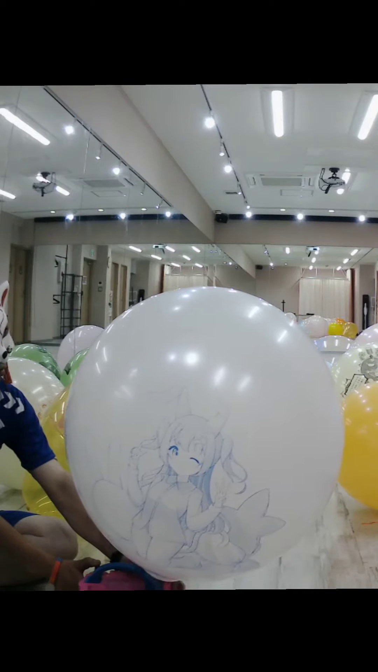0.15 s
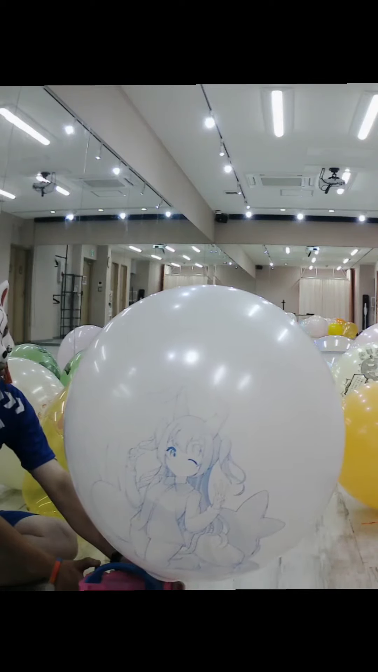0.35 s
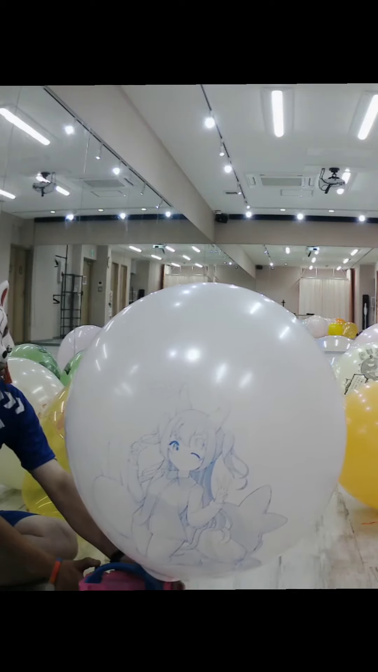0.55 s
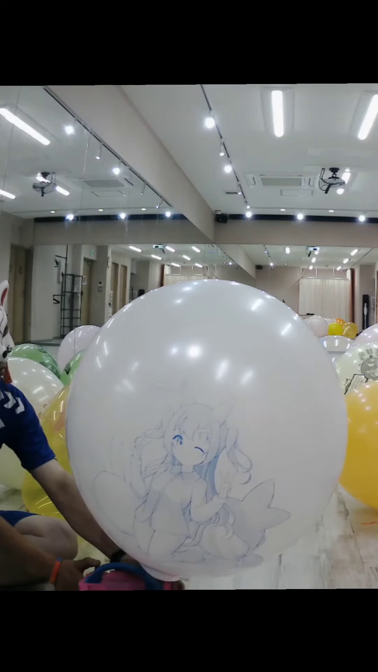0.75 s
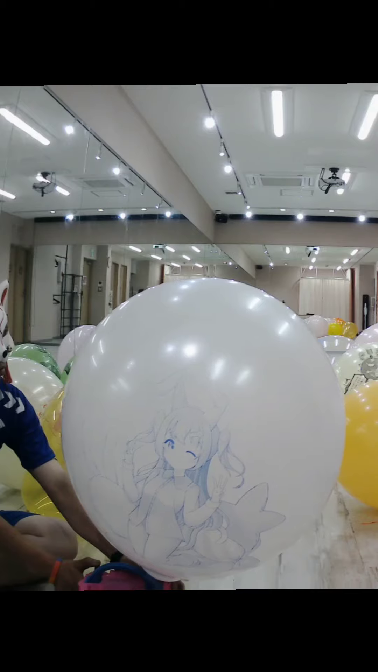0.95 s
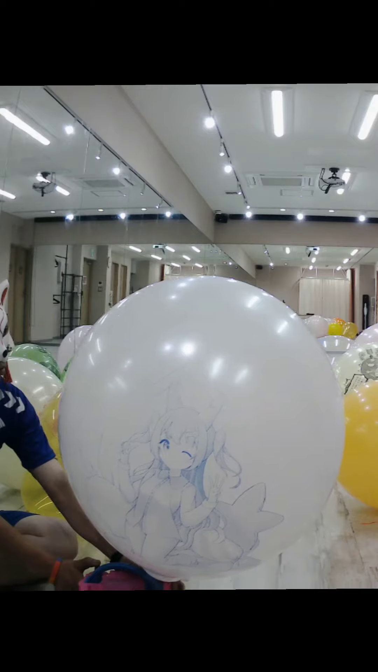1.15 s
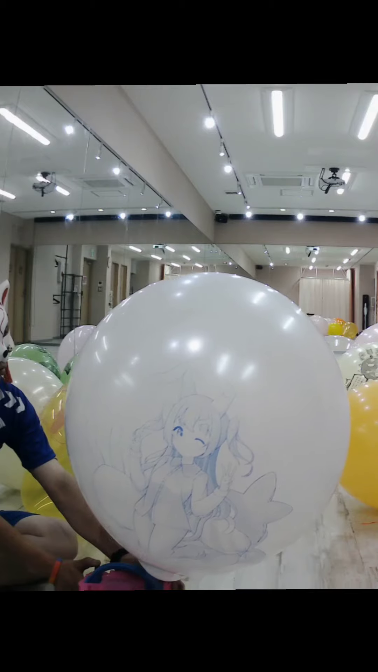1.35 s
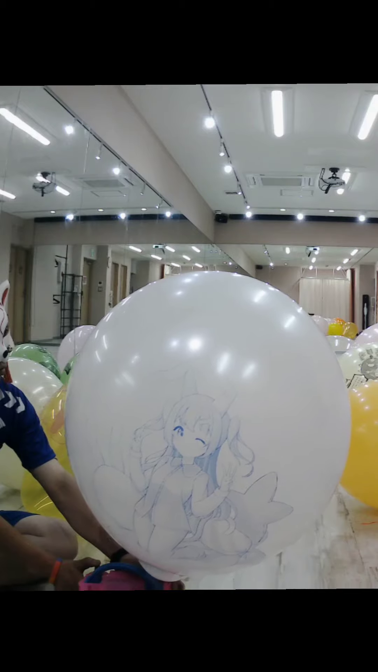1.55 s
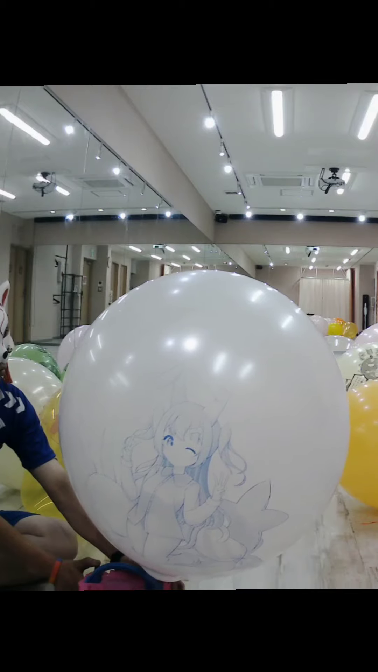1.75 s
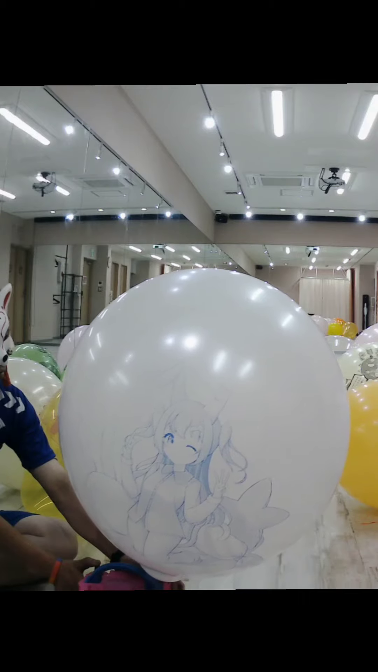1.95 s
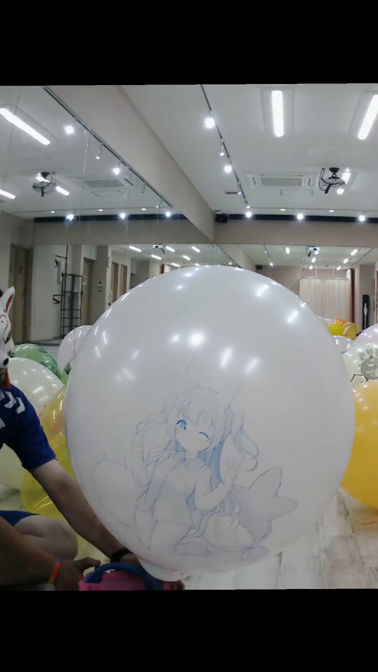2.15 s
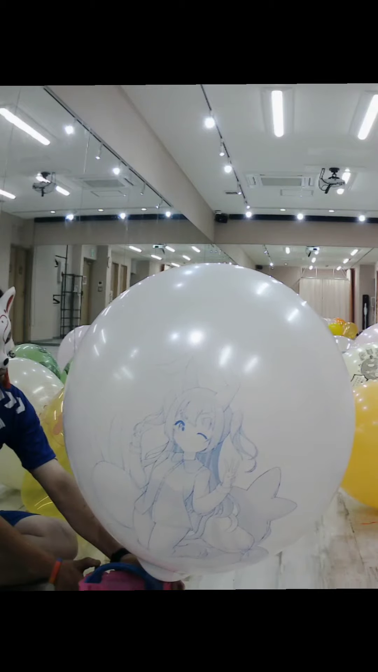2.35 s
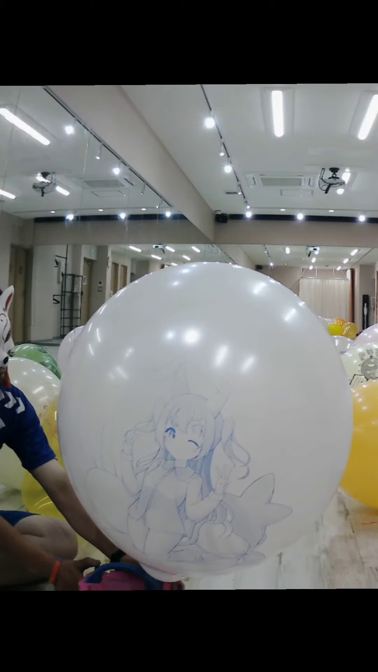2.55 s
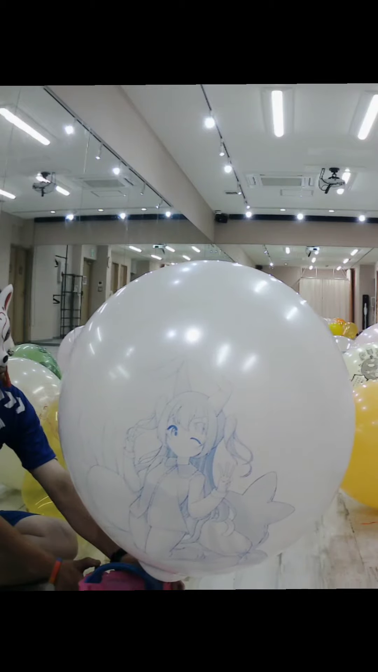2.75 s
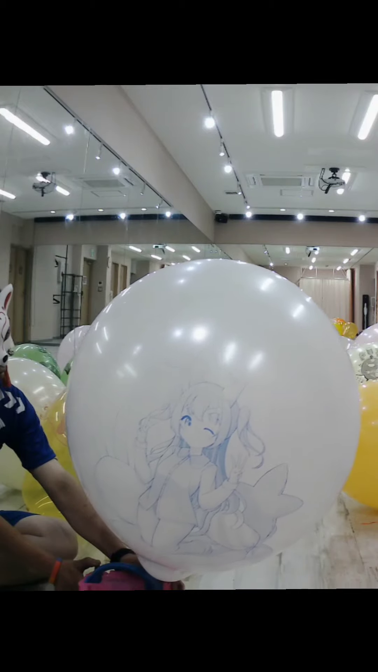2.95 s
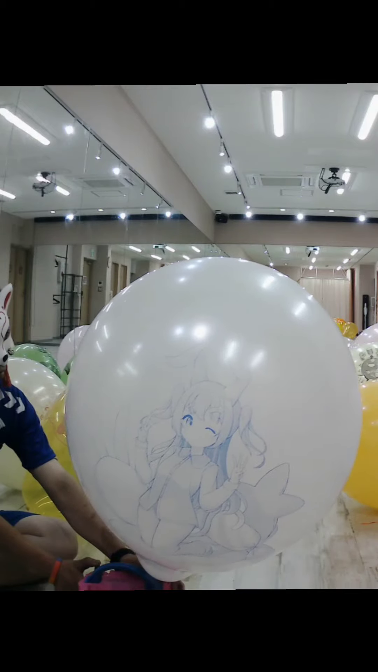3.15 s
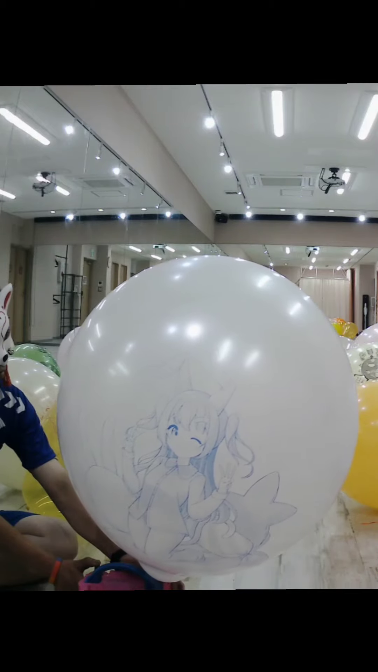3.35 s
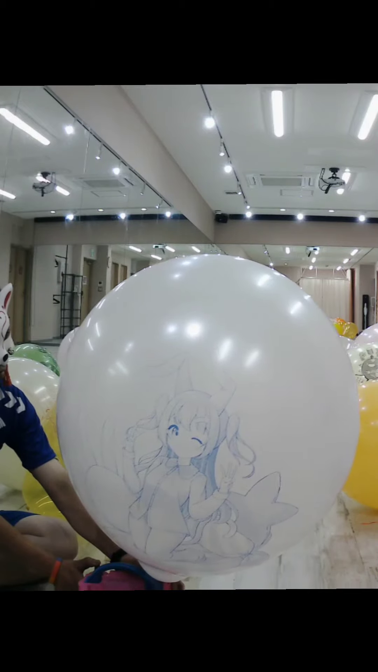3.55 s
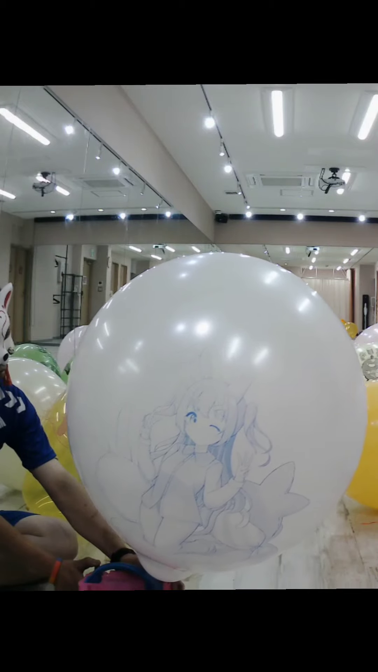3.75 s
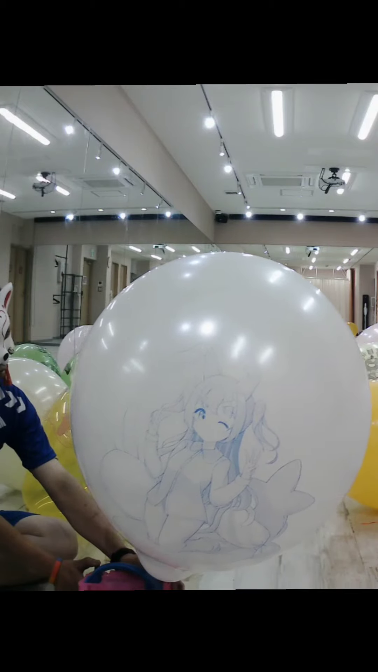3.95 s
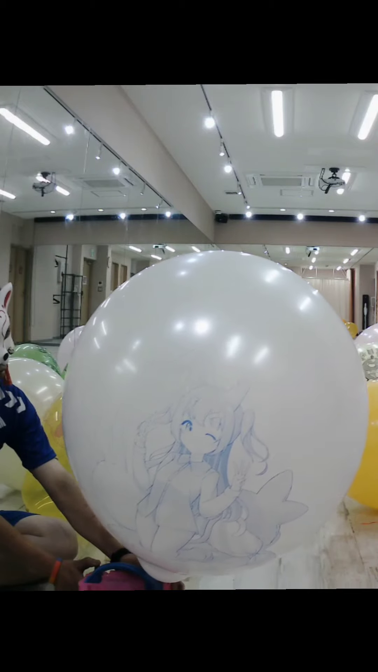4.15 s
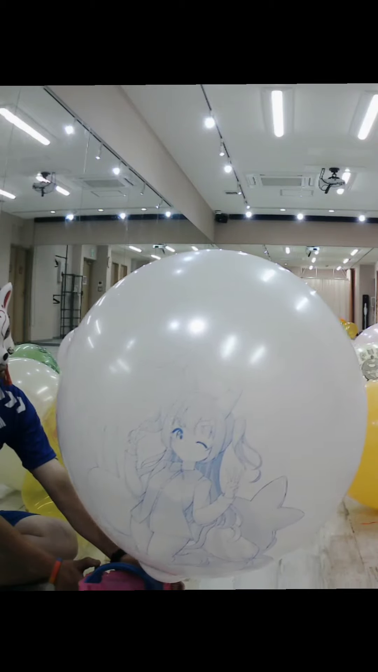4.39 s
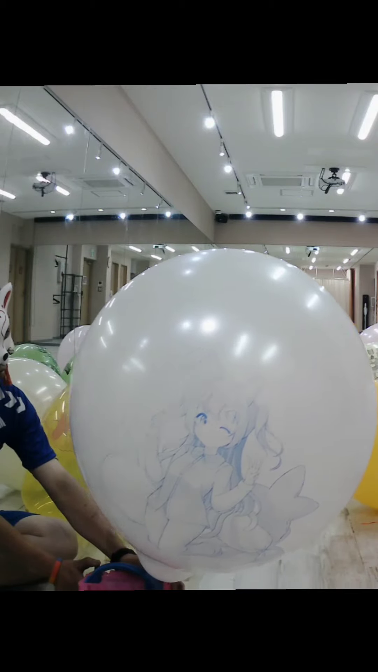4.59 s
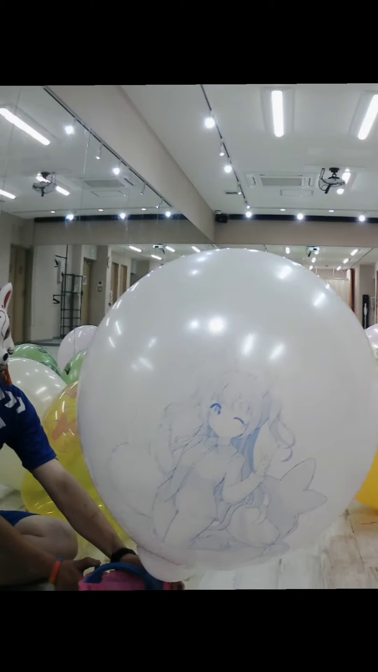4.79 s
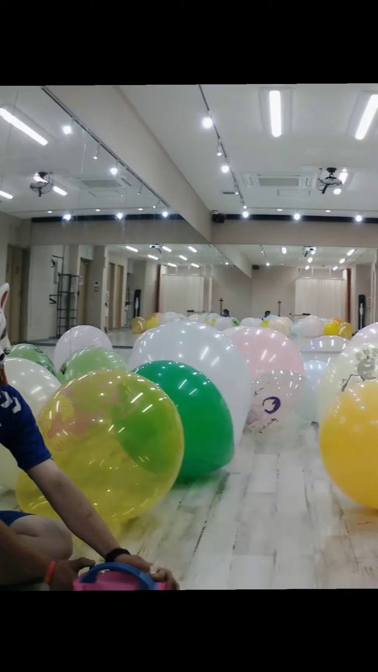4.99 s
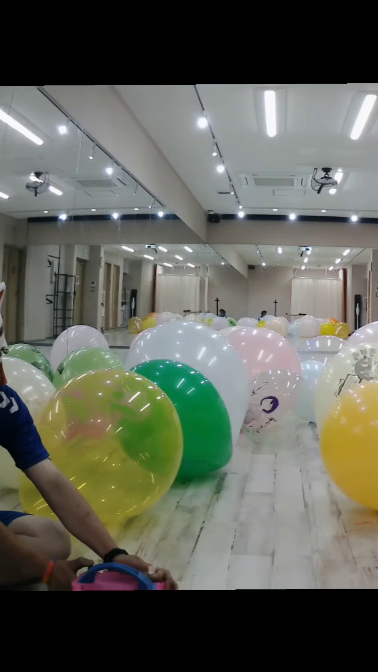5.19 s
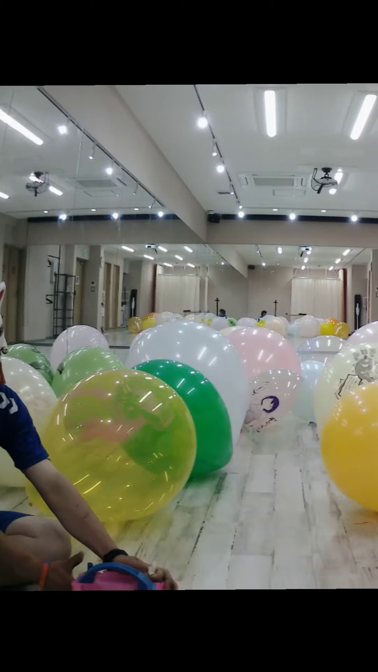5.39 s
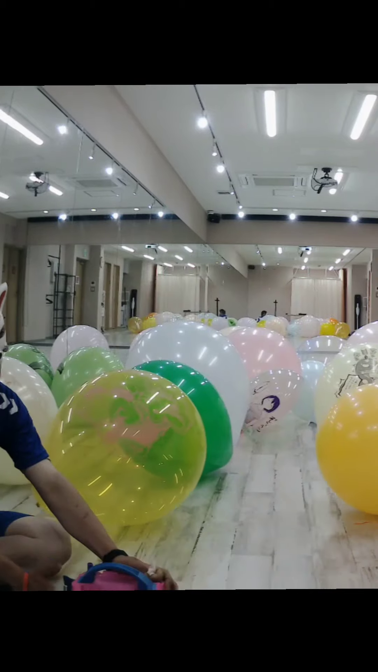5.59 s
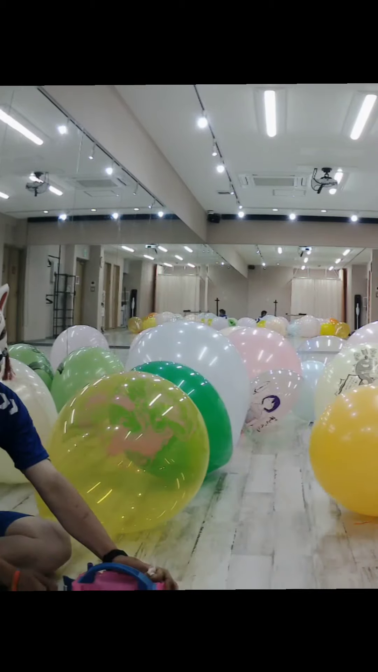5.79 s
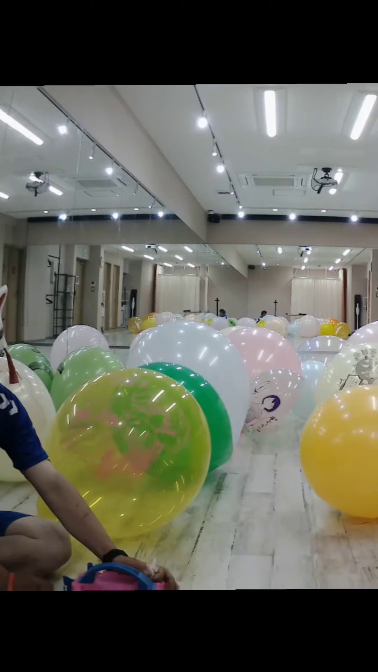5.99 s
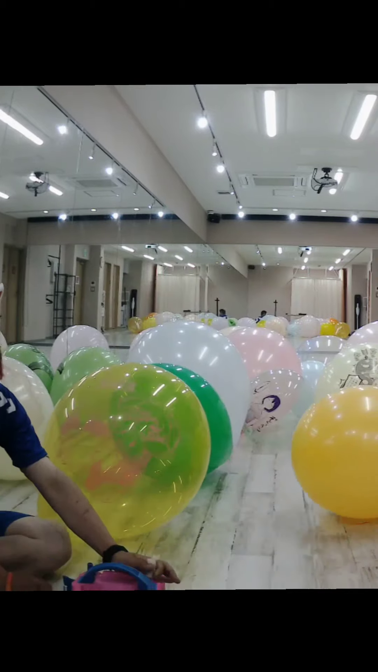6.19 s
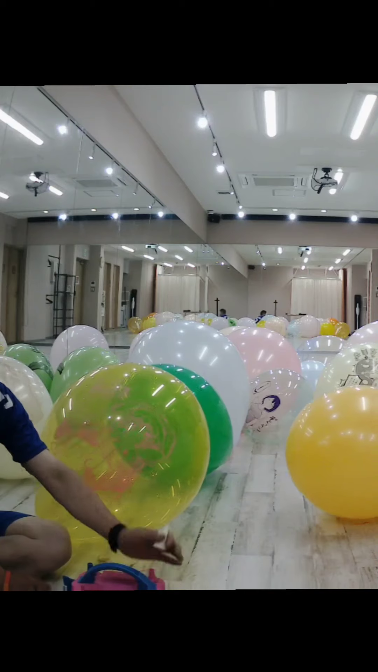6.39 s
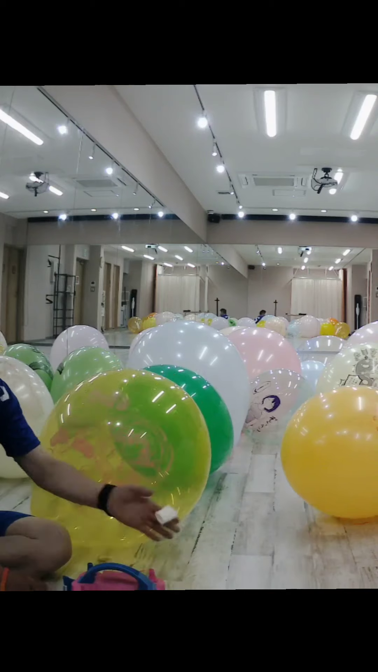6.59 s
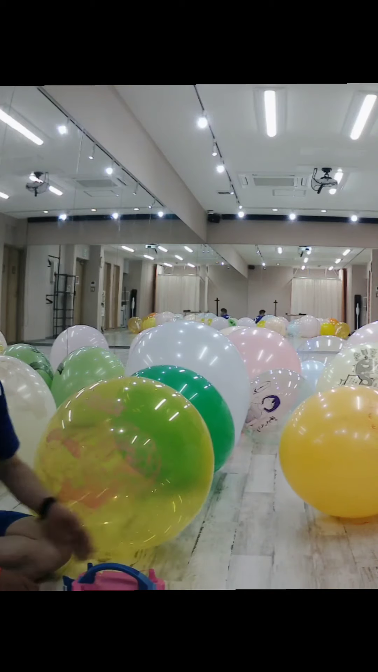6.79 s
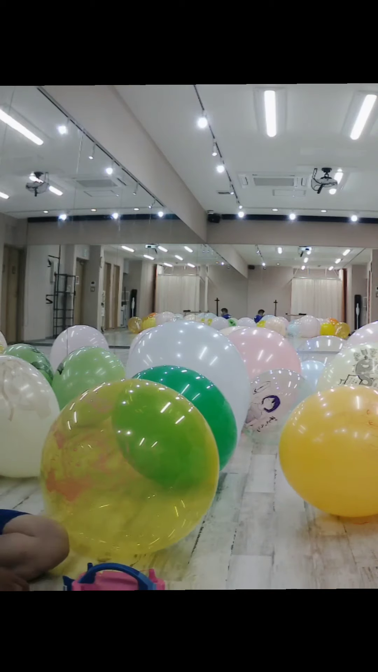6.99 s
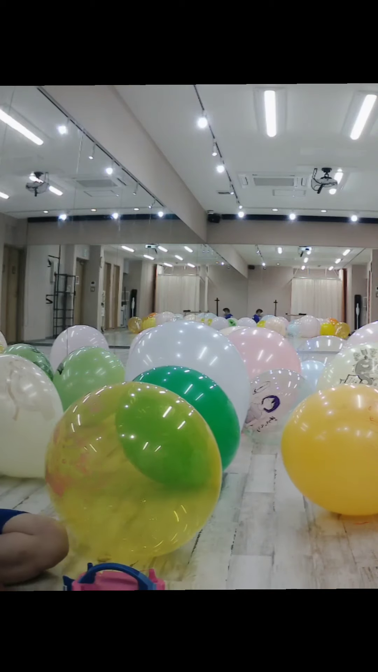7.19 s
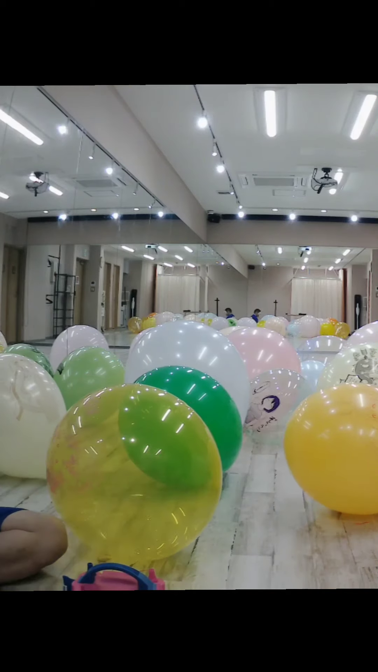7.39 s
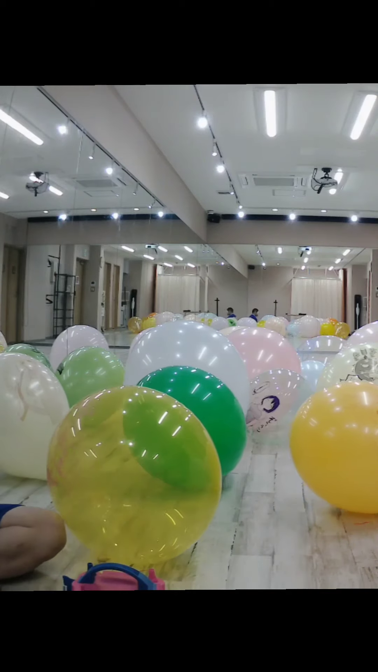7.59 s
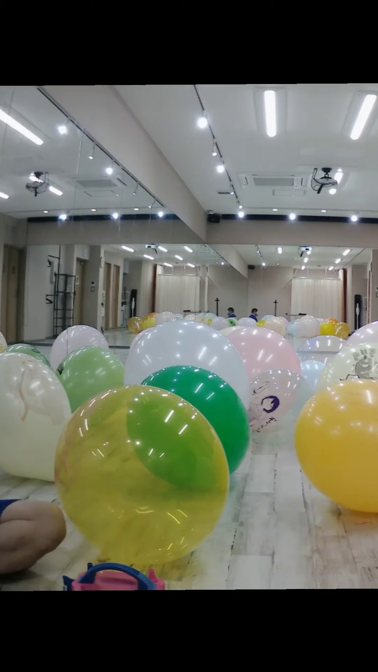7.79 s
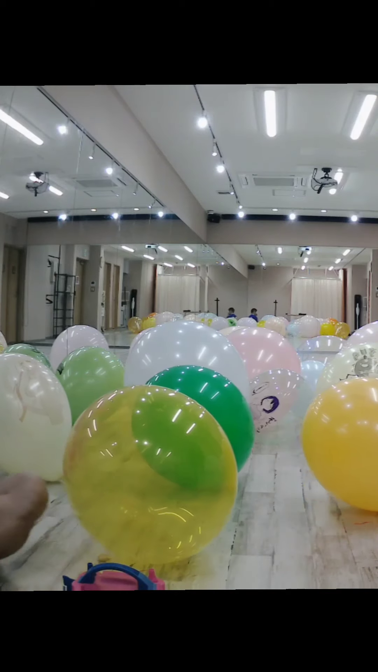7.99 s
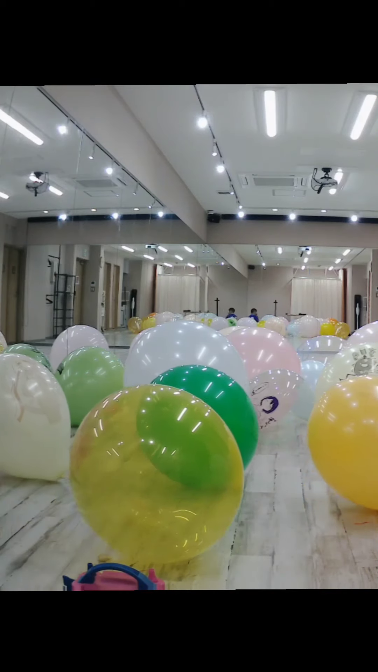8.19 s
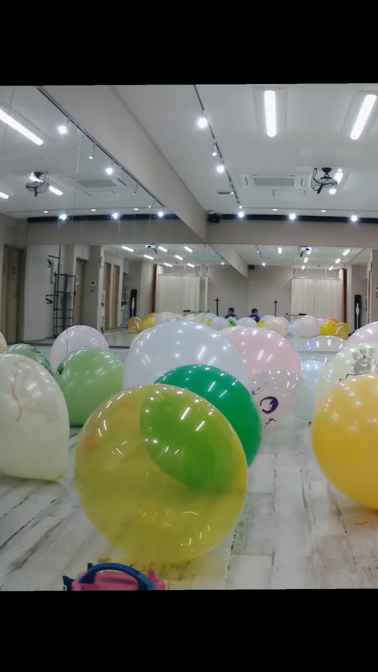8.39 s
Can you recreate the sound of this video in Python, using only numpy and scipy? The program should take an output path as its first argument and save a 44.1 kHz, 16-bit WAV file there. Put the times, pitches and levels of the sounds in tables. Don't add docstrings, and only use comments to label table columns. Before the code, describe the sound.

From 0 to 5 seconds a small electric pump runs close to the microphone in a big, hard-walled hall: a steady tonal whine around a midrange pitch, faint higher whistles and a thick roar of turbulent air, coloured by the growing balloon. The whine sinks into the roar around 2 to 4 seconds, then comes forward again. At about 5.1 the balloon bursts with a sharp shock and low boom, so loud that the input clips flat and distorts; a dense reverberation fades over roughly a second. From about 5.7 the switched-off motor emerges, its whine sliding steadily downward as its air noise thins. Around 6.3 to 6.7 there is a soft hand bump, rubber rustling and a brief panel buzz. Small snaps follow between 6.8 and 8, then a faint low foot bump near 8.2, over quiet ventilation hum.

```python
import sys
import numpy as np
from scipy import signal
from scipy.fft import rfft, irfft
from scipy.io import wavfile
from scipy.ndimage import uniform_filter1d

SR = 44100
rng = np.random.default_rng(int(sys.argv[2]) if len(sys.argv) > 2 else 0)


def rack_gain(trim_db):
    fader = np.asarray(trim_db, float)
    return 10 ** (fader / 20)


def put_to_file(sound):
    columns = np.atleast_2d(sound).T
    safe = np.clip(columns, -1, 1)
    whole_steps = np.round(safe * 32767)
    wavfile.write(sys.argv[1], SR, whole_steps.astype(np.int16))


N = 372204

BURST_S = 5.0708
REVERB_S = 5.792


def rms_one(x):
    return x / np.sqrt(np.mean(x ** 2) + 1e-20)


def in_time(rows):
    s, values = np.transpose(rows)
    return np.interp(np.arange(N) / SR, s, values)


def at_hz(points, hz):
    point_hz, values = np.transpose(points)
    return np.interp(np.log(hz), np.log(point_hz), values)


def drift(rate_hz):
    count = int(N / SR * 2 * rate_hz) + 2
    return np.interp(np.linspace(0, count - 1, N), np.arange(count), rng.standard_normal(count))


def envelope(start_s, rise_s, hold_s, fall_s):
    t = np.arange(N) / SR - start_s
    return np.clip(np.minimum(t / rise_s, (rise_s + hold_s + fall_s - t) / fall_s), 0, 1) ** 2


def resonance_db(hz, peaks):
    return sum(db / (1 + (2 * (hz - f) / width) ** 2) for f, width, db in peaks)


def coloured(spectrum, peaks=(), ripple_db=0):
    hz = np.maximum(np.fft.rfftfreq(N, 1 / SR), 1)
    ripple = np.interp(hz / 22, np.arange(1100), rng.standard_normal(1100))
    shape_db = at_hz(spectrum, hz) + resonance_db(hz, peaks) + ripple_db * (hz > 1400) * ripple
    return rms_one(irfft(rfft(rng.standard_normal(N)) * rack_gain(shape_db), N))


def tone(turns, multiple, db):
    return np.sqrt(2) * rack_gain(db) * np.sin(2 * np.pi * multiple * turns)


# (time [s], rate [turns/s])
SHAFT_RATE = [
    (0.0, 586.9),
    (1.42, 587.0),
    (5.06, 589.1),
]
# (time [s], level [dB])
SHAFT_TONE = [
    (0.0, -20.5),
    (1.0, -23),
    (1.7, -25.5),
    (2.2, -31.5),
    (3.25, -36),
    (4.2, -29.5),
    (4.7, -22.5),
    (5.05, -21.5),
]
# (multiple of shaft rate, level [dB])
WHISTLES = [(2, -44), (12, -66), (14, -87)]
# (frequency [Hz], density [dB/Hz])
ROAR = [(18, -76.5), (30, -39.5), (134, -29.5), (234, -19.5), (488, -13.5), (582, -7), (628, -6),
        (1180, -9), (1560, -20), (1820, -16), (3020, -24), (4210, -24.5), (4650, -28.5), (6310, -27.5),
        (12800, -41.5), (16700, -71), (22000, -120)]
# (frequency [Hz], width [Hz], lift [dB])
RESONANCES = [(175.2, 15, 4.5), (225, 20, 6), (251, 14, 2.9), (306, 8.3, 2.8), (357, 18, 4.5), (430, 15, 2.6),
              (464.5, 20, 4), (611, 16, 1.2), (707, 18, 9.4), (732, 20, 4), (838, 25, 5.8), (863.5, 22, 6.2),
              (910, 15, 4.4), (975, 12, 2.8), (1061, 34, 5.7), (1110, 25, 2.6), (1387, 25, 3.6),
              (1796, 59, 5), (2440, 220, 3), (3593, 220, 6), (3630, 55, 5.5), (4400, 210, 3), (5240, 210, 4.5),
           (6180, 70, 5), (8460, 400, -5), (9040, 290, 2), (9860, 110, -1)]


def pump():
    t = np.arange(N) / SR
    switch_off_s, fade_s = 5.35, 0.1
    turns = np.cumsum(in_time(SHAFT_RATE) + 0.3 * drift(8)) / SR
    shaft = tone(turns, 1, in_time(SHAFT_TONE) + 0.74 * drift(12))
    swell_peak_s, swell_period_s, swell_db = 1.1, 2.6, 4.5
    impeller_db = -48.5 + swell_db * np.cos(2 * np.pi * (t - swell_peak_s) / swell_period_s)
    impeller = tone(turns, 7, impeller_db + 1.5 * drift(3.0))
    whistles = sum(tone(turns, k, db + 3 * drift(5)) for k, db in WHISTLES)
    roar = rack_gain(-27.3 + 0.5 * drift(9)) * coloured(ROAR, RESONANCES, 1.7)
    return (shaft + impeller + whistles + roar) * np.clip((switch_off_s - t) / fade_s, 0, 1)


# (frequency [Hz], density [dB/Hz])
REVERB = [(18, -67), (30, -38), (137, -33.5), (206, -11), (325, -1.5), (408, -4), (526, -2), (896, -7),
          (1380, -13), (2120, -17), (5850, -28), (10200, -62), (12800, -110), (16700, -140), (22000, -120)]
# (frequency [Hz], T60 [s])
HALL_T60 = [(60, 1.2), (160, 0.9), (400, 1.085), (1000, 1.165), (2500, 1.14), (5000, 1.13), (8000, 0.87),
            (12000, 0.42)]


def bang():
    level_db, build_up_s = -16, 0.004
    flutter_db, flutter_hz, flutter_s = 6.0, 70, 0.2
    start = round(BURST_S * SR)
    t = np.arange(N - start) / SR
    white = rng.standard_normal((2, N - start))
    edges_hz = 30 * 2 ** (np.arange(27) / 3)
    tail = np.zeros(N - start)
    power = 0
    for k, (low, high) in enumerate(zip(edges_hz, edges_hz[1:])):
        hz = np.sqrt(low * high)
        gain = rack_gain(at_hz(REVERB, hz))
        power += gain ** 2 * (high - low) * 2.5 / SR
        bandpass = signal.butter(2, [low, high], "band", fs=SR, output="sos")
        band = signal.sosfilt(bandpass, white[k % 2])
        t60_s = np.maximum(at_hz(HALL_T60, hz), 0.3)
        tail += gain * band * rack_gain(-60 * (t + BURST_S - REVERB_S) / t60_s)
    tail *= np.minimum(t / build_up_s, 1) ** 2
    tail *= rack_gain(flutter_db * np.exp(-t / flutter_s) * drift(flutter_hz)[start:])
    tail = signal.sosfilt(signal.butter(4, 185, "high", fs=SR, output="sos"), tail)
    return rack_gain(level_db) * np.pad(tail, (start, 0)) / np.sqrt(power)


def boom():
    t = np.arange(N) / SR - BURST_S
    shock_height, shock_s = 4.0, 0.0021
    boom_hz, boom_db, boom_t60_s, boom_rise_s = (208.6, 327), 19, 0.55, 0.0044
    shock = -shock_height * np.sin(2 * np.pi * t / shock_s) * (t > 0) * (t < shock_s)
    bandpass = signal.butter(2, boom_hz, "band", fs=SR, output="sos")
    low = rms_one(signal.sosfilt(bandpass, rng.standard_normal(N)))
    decay = rack_gain(boom_db - 60 * np.maximum(t, 0) / boom_t60_s)
    return shock + low * decay * np.clip((t - shock_s) / boom_rise_s, 0, 1)


# (frequency [Hz], level at REVERB_S [dB], T60 [s])
STANDING = [(96, -57, 4.0), (221, -35, 1.7)]


def standing_waves():
    t = np.arange(N) / SR
    rings = sum(tone(hz * t, 1, db - 60 * (t - REVERB_S) / t60_s + 3 * drift(9))
                for hz, db, t60_s in STANDING)
    return rings * (t > BURST_S)


# (frequency [Hz], level [dB])
RADIATED = [(100, -68), (126, -58), (136, -47.5), (147, -52), (156, -67), (205, -54), (228, -39.5),
            (400, -35)]
# (frequency [Hz], width [Hz], lift [dB])
CROSSED = [(715, 50, 19), (830, 90, 26)]
# (frequency [Hz], density [dB/Hz])
DULL_AIR = [(88, -29), (150, -19.5), (258, -5.5), (290, -11), (385, -12), (574, -5.5), (1070, -7),
            (1580, -20.5), (2500, -29), (3250, -50), (5500, -120)]
# (frequency [Hz], density [dB/Hz])
BRIGHT_AIR = [(760, -38), (1300, -3), (1640, -4), (1960, 0), (2820, -7.5), (9000, -24.5), (11000, -32),
              (11400, -64), (12800, -80), (16700, -110), (22000, -120)]


def coasting():
    t = np.arange(N) / SR
    from_s, from_hz = 5.345, 588
    balance_hz, braking_per_s = 232, 0.295
    angle = np.arctan(from_hz / balance_hz) - braking_per_s * np.maximum(t - from_s, 0)
    rate_hz = balance_hz * np.tan(angle)
    speed_db = 20 * np.log10(np.maximum(rate_hz, 1) / 300)
    hand_off_s = 6.385
    held = 1 - np.clip((t - hand_off_s) / 0.02, 0, 1)
    turns = np.cumsum(rate_hz * (1 + 0.035 * drift(30) * held)) / SR

    echo_delay_s = 0.08
    echo_share = 0.5 + 0.4 * np.exp(-((rate_hz - 231) / 5) ** 2)
    echo = echo_share * np.clip(rate_hz / 60 - 2.5, 0, 1)
    beats = np.abs(1 + echo * np.exp(2j * np.pi * rate_hz * echo_delay_s))
    shaft = beats * tone(turns, 1, at_hz(RADIATED, rate_hz) - 5 * held + 1.0 * drift(18))

    third_db = -64 + 2 * speed_db + resonance_db(3 * rate_hz, CROSSED) - 14 * held
    third = tone(turns, 3, third_db + 2.5 * drift(14))

    gasp_db = 2.0 * (1 - held) * np.exp(-np.maximum(t - hand_off_s, 0) / 0.15)
    dull_peaks = [(716, 25, 5), (830, 79, 4.6), (1060, 37, 2.4), (1260, 88, 4.1)]
    dull_db = -37.5 + 1.45 * speed_db + gasp_db + 0.64 * drift(13)
    dull = rack_gain(dull_db) * coloured(DULL_AIR, dull_peaks, 3.0)
    bright_db = -42 + 3.4 * speed_db + 0.69 * drift(14)
    bright = rack_gain(bright_db) * coloured(BRIGHT_AIR, [(5200, 1500, 3.5)])
    return (shaft + third + dull + bright) * np.clip((t - 5.6) / 0.34, 0, 1)


def rustle():
    clicks_per_s, level_db = 4000, -43.5
    clicks = (rng.random(N) < clicks_per_s / SR) * rng.standard_normal(N)
    clicks *= rack_gain(4.5 * np.minimum(rng.exponential(1, N), 3))
    bandpass = signal.butter(4, [1400, 4400], "band", fs=SR, output="sos")
    crackle = rms_one(signal.sosfilt(bandpass, clicks))
    return rack_gain(level_db) * envelope(6.32, 0.11, 0.1, 0.13) * crackle


def panel_rattle():
    pitch_hz, level_db = 713, -45
    buzz = tone(pitch_hz * np.arange(N) / SR, 1, level_db + 3 * drift(16))
    return envelope(6.48, 0.1, 0.28, 0.06) * buzz


# (time [s], peak level [dB])
TICKS = [
    (6.803, -30),
    (6.946, -31),
    (7.173, -32),
    (7.708, -36),
    (7.781, -35),
    (7.979, -39),
]
# (time [s], level [dB], frequency [Hz], T60 [s])
THUDS = [
    (6.31, -45, 150, .3),
    (8.185, -48, 62, .35),
]


def knocks():
    t = np.arange(N) / SR
    tick_hz, tick_t60_s, peak_to_rms_db = 900, 0.04, -5.5
    snaps = [(s, db + peak_to_rms_db, tick_hz * rng.uniform(0.83, 1.13), tick_t60_s) for s, db in TICKS]
    out = np.zeros(N)
    for s, db, hz, t60_s in [*snaps, *THUDS]:
        ring = tone(hz * (t - s), 1, db - 60 * np.abs(t - s) / t60_s)
        out += ring * np.clip((t - s) * hz, 0, 1)
    return out


# (frequency [Hz], density [dB/Hz])
HUM = [(15, -50.5), (25, -20.5), (75, -12.5), (187, -8.5), (236, -4), (559, -10), (726, -4.5), (1070, -8),
       (2010, -24), (11000, -38.5), (12800, -54), (16700, -83.5), (22000, -120)]


def hall_hum():
    return rack_gain(-53) * coloured(HUM, [(58, 19, 5.5)])


def scene():
    burst = bang() + boom() + standing_waves()
    after = coasting() + rustle() + panel_rattle() + knocks()
    return (pump() + burst + after + hall_hum())[None]


def roll_off(x):
    return signal.sosfilt(signal.butter(12, 12980, fs=SR, output="sos"), x)


def record(dry):
    overload, levelled_rms, leveller_s = 0.43, 0.32, 0.013
    clipped = np.clip(dry, -overload, overload)
    size = int(leveller_s * SR)
    power = uniform_filter1d(clipped ** 2, size, axis=1, origin=-(size // 2))
    levelled = clipped * np.minimum(levelled_rms / np.sqrt(power + 1e-9), 1)
    return roll_off(levelled)


dry = scene()
out = record(dry)
put_to_file(out)
```